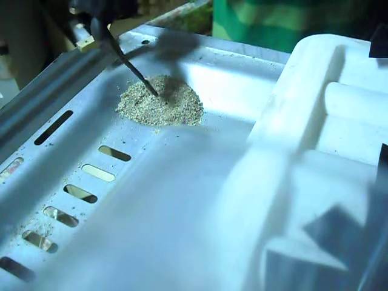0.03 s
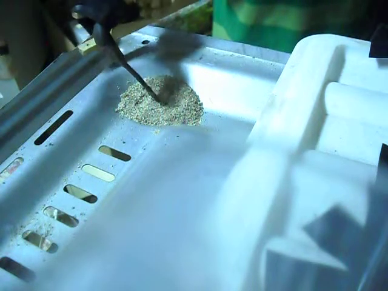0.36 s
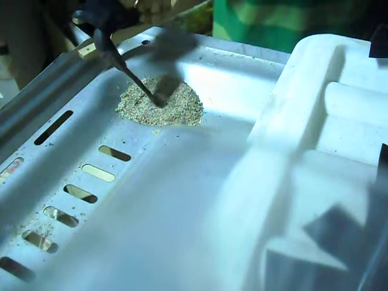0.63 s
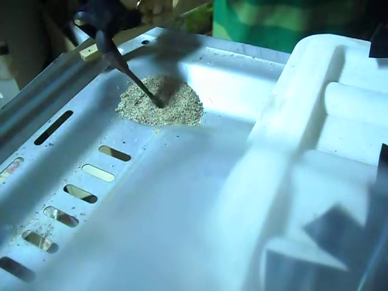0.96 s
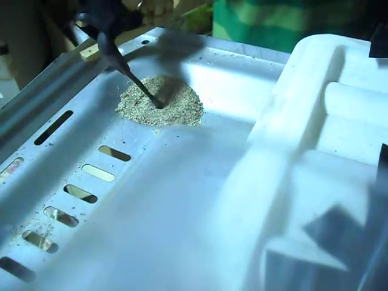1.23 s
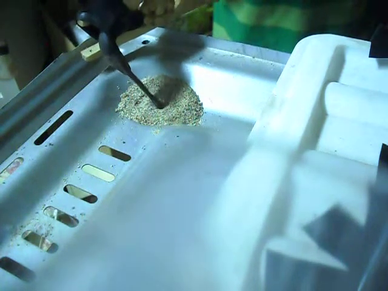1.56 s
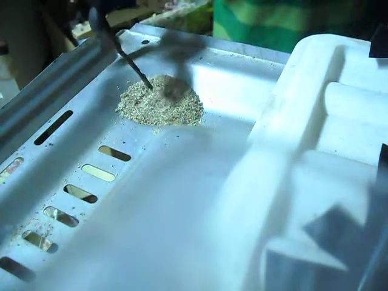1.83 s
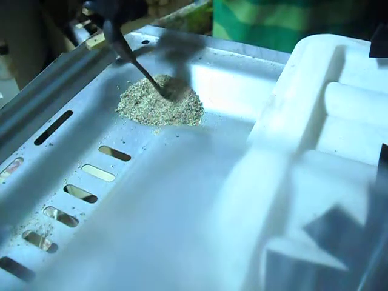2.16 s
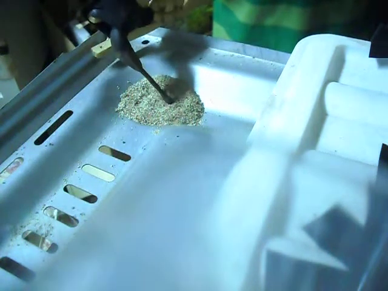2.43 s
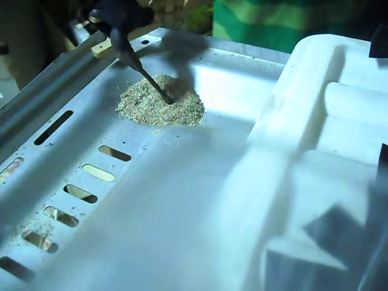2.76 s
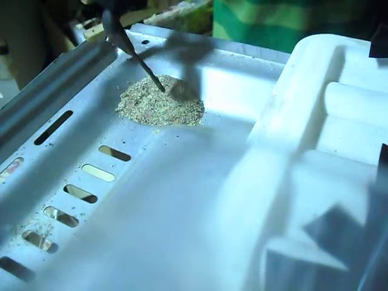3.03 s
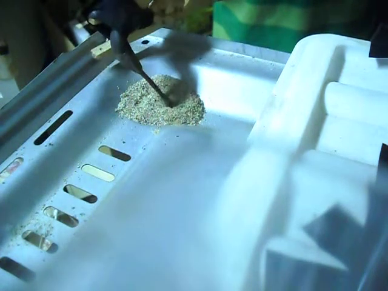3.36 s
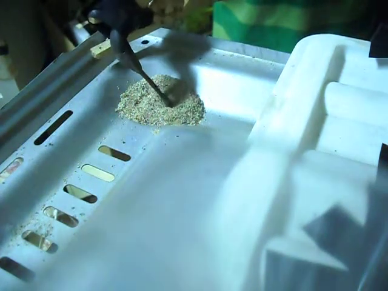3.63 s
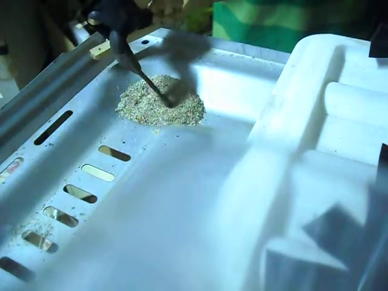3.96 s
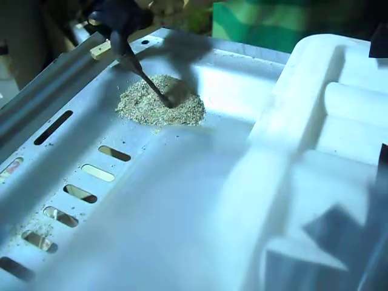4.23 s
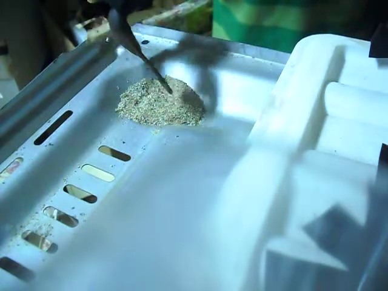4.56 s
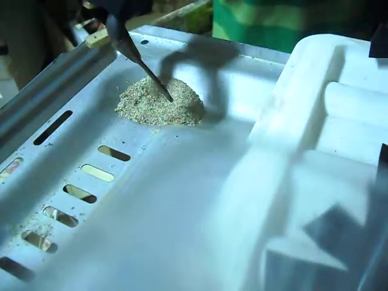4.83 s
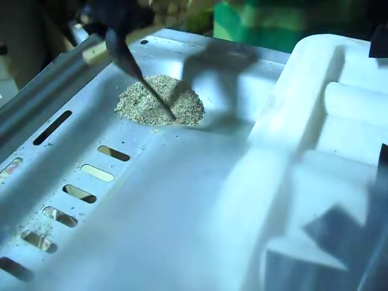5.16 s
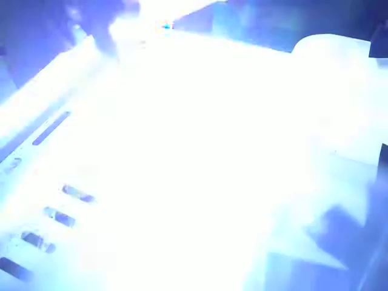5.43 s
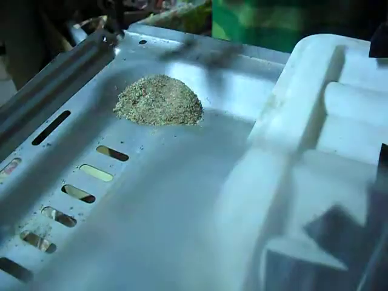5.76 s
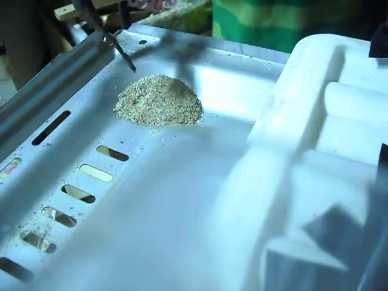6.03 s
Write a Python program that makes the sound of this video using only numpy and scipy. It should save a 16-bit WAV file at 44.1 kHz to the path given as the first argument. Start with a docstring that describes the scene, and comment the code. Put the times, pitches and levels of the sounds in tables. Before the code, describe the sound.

A high-voltage transformer hums deeply and steadily throughout, with faint room hiss, heard close to the bench in a small workshop with little echo. An electrode rod poking a heap of sand knocks softly and irregularly on a metal tray, at about 0.5, 0.7, 1.2, 2.0 and 2.3 seconds, each a dull thud with a slight ring. At 3.2 seconds comes a much louder, dry clack, followed by two small knocks and another at 4.4 seconds. At 5.2 seconds a tick, a thud and a brief hiss come as current starts to throb. From about 5.3 seconds an electric arc catches, sizzling and swelling fast into a loud, harsh buzz, the loudest sound here. It cracks twice and breaks off just after 5.6 seconds with a soft, low puff. One more light knock sounds at 5.9 seconds over the continuing hum.

```python
"""A small workshop, a camera microphone near the bench. A high-voltage transformer hums on 60 Hz mains
while an electrode rod pokes a heap of sand on a metal tray and knocks now and then. At about 5.2 s
current flows through the sand; then an arc catches, striking anew in every half cycle and collapsing
harder in one polarity. It sizzles, swells into a loud buzz as it is drawn out, cracks twice and
breaks after 0.3 s. One more knock follows over the hum."""
import sys
import numpy as np
from scipy import signal
from scipy.fft import rfft, irfft
from scipy.io import wavfile
from scipy.ndimage import uniform_filter1d, map_coordinates

SR = 44100
rng = np.random.default_rng(int(sys.argv[2]) if len(sys.argv) > 2 else 0)


def generate_wav(signal):
    """Clip the signal to [-1, 1] and save it as 16-bit WAV at the path in sys.argv[1]."""
    frames = np.transpose(np.atleast_2d(signal))
    scaled = np.clip(frames, -1, 1) * 32767
    pcm = np.round(scaled).astype(np.int16)
    wavfile.write(sys.argv[1], SR, pcm)


N = 268569
TIME = np.arange(N) / SR

MAINS_HZ = 59.985
STRIKE_S = 5.3772  # one strike of the arc; sets the phase of the mains
CONTACT_S, ARC_ON_S, ARC_OFF_S = 5.195, 5.33, 5.623  # current starts, arc catches, arc breaks


def arc(strike_db=-22.7, collapse_db=-17, weak_db=-10, scatter_db=1.5, jitter_ms=0.1, rebound=0.9):
    """Each half cycle the channel heats with a pressure pulse, then snaps shut; longer is louder, duller."""
    # how well the short channel radiates: (frequency [Hz], gain [dB])
    radiation = [(30, -10), (65, -30), (115, 2.5), (190, 3), (320, 1.5), (480, -2.5), (700, 0.5),
                 (1000, -1.5), (1450, 1.5), (2100, -5), (3200, -3.5), (4200, -5), (6000, 3), (8000, 0)]
    short_ms, long_ms = 0.13, 0.34  # pulse width at length 0 and 1
    max_lag_ms, lag_length = 2.31, 0.402  # the collapse trails the strike more as the arc grows
    snap_until_s, snap_fade_db_per_s = 5.478, 320  # only a short arc ends its collapse in a sharp snap
    overstretched_s, collapse_fade_db_per_s = 5.562, 310  # no louder from here; it stays hot, collapses fade
    cooling_ms = 1000 / (8 * MAINS_HZ)
    halves = np.arange(np.ceil((ARC_ON_S - STRIKE_S) * 2 * MAINS_HZ), (ARC_OFF_S - STRIKE_S) * 2 * MAINS_HZ)
    out = np.zeros(N)
    for half, chance in zip(halves, rng.standard_normal((len(halves), 4))):
        start = STRIKE_S + half / (2 * MAINS_HZ)
        near = abs(TIME - start) < 1 / MAINS_HZ
        ms = (TIME[near] - start) * 1000
        length = arc_length(start)
        drawn = min(length / arc_length(overstretched_s), 1)
        width_ms = short_ms + (long_ms - short_ms) * length
        heating_ms = 0.72 * width_ms
        # the air pushed out by the strike flows back slowly as the channel cools
        backflow = heating_ms / cooling_ms * bell(ms / cooling_ms - 2)
        strike = bell((ms - jitter_ms * chance[0]) / heating_ms) - backflow
        out[near] += drawn ** 1.23 * undb(strike_db + scatter_db * chance[2]) * strike
        lag_ms = max_lag_ms * np.tanh((length / lag_length) ** 2)
        u = (ms - lag_ms - 2 * jitter_ms * chance[1]) / width_ms
        snap_db = 2.5 - snap_fade_db_per_s * past(start, snap_until_s)
        collapse = clap(u, rebound) + undb(snap_db) * clap(u / 0.32, rebound)
        level_db = collapse_db + weak_db * (half % 2) - collapse_fade_db_per_s * past(start, overstretched_s)
        out[near] += drawn ** 1.7 * undb(level_db + scatter_db * chance[3]) * collapse
    # the corner of the tray rings briefly after every pulse
    return colour(out + undb(-6) * resonance(out, hz=900, width_hz=450), radiation)


def arc_length(s):
    """Length of the arc, growing evenly from 0 when it catches to 1 when it breaks."""
    return np.clip((s - ARC_ON_S) / (ARC_OFF_S - ARC_ON_S), 0, 1)


def sizzle(delay_ms=4.1, width_ms=0.99, weak_db=-9, steady_db=-17, flicker_db=2.5, spit_ms=0.11):
    """The hot sand hisses near each current peak, mostly in one polarity; single sparks tick."""
    # hiss of the sand: (frequency [Hz], density [dB per Hz])
    spectrum = [(500, -7), (1400, 7.5), (2500, -5), (4200, -6), (6300, 5), (7900, -6), (10000, 4),
                (12500, -5.5)]
    # sand heated at first touch, then under the arc: (start [s], end [s], level [dB])
    burns = [(5.202, 5.225, -48), (5.336, 5.623, -41)]
    # lone sparks: (time [s], level [dB], t60 [s])
    sparks = [(5.195, -45, 0.0032), (5.3933, -37, 0.0035), (5.5047, -38, 0.014), (5.577, -47, 0.003)]
    rise_db_per_s, fall_db_per_s, lift_db = 550, 3000, -7
    half, part = np.divmod((TIME - STRIKE_S) * 2 * MAINS_HZ, 1)
    ms = part * 1000 / (2 * MAINS_HZ)
    gate = bell((ms - delay_ms) / width_ms) * undb(weak_db * (1.5 - half % 2)) + undb(steady_db)
    gate += 0.22 * np.exp(-ms / spit_ms)  # every strike also spits briefly
    heat = sum(undb(db - rise_db_per_s * past(start, TIME) - fall_db_per_s * past(TIME, end))
               for start, end, db in burns)
    # the hiss weakens as the arc lifts off the sand
    envelope = (TIME > CONTACT_S) * gate * heat * undb(lift_db * arc_length(TIME) + flicker_db * walk(150))
    for s, db, t60 in sparks:
        envelope += undb(db) * fade(TIME - s, t60)
    speed = 1 - 0.07 * arc_length(TIME)  # the bright bands sink as the arc grows
    return envelope * map_coordinates(noise(spectrum), [np.cumsum(speed)], order=3, mode="wrap")


def cracks(hz=3000, width_hz=1900, t60=0.016):
    """Short rasping bursts where the long channel kinks."""
    # kinks of the channel: (time [s], level [dB])
    kinks = [(5.5447, -44), (5.5617, -40.5)]
    rasp = unit(resonance(resonance(rng.standard_normal(N), hz, width_hz), hz, width_hz))
    return rasp * sum(undb(db) * fade(TIME - s, t60) for s, db in kinks)


def heated_air(throb_db=-46, flutter_db=-60, tray_db=-56, growth_db=6.5, rise_s=0.038, lag_s=0.0025):
    """Under current the air throbs at twice the mains rate and flutters; the tray sings until the rod lifts."""
    flowing = np.minimum(past(TIME, CONTACT_S) / rise_s, 1) * fade(past(TIME, ARC_OFF_S), t60=0.018)
    # near full length the throb grows and catches up with the strike
    stretch = arc_length(TIME) ** 3
    turn = 2 * np.pi * MAINS_HZ * (TIME - STRIKE_S - lag_s * (1 - stretch))
    # unequal polarities add an odd multiple of the mains
    throb = np.sqrt(2) * (np.cos(2 * turn) + undb(-17) * np.cos(3 * turn))
    tray = unit(resonance(rng.standard_normal(N), hz=480, width_hz=45))
    flutter = unit(resonance(rng.standard_normal(N), hz=220, width_hz=130))
    air = undb(growth_db * stretch) * (undb(throb_db) * throb + undb(flutter_db) * flutter)
    return flowing * (air + undb(tray_db) * tray * fade(past(TIME, ARC_ON_S), t60=0.08))


def break_puff(db=-52, width_s=0.0056):
    """The last hot air collapses with a soft, low puff when the arc breaks."""
    return undb(db) * clap((TIME - ARC_OFF_S - width_s) / width_s, rebound=0.45)


def knocks(chatter_s=0.0082, thud_lag_s=0.018, settle_s=0.0048, onset_s=0.00059, thud_t60=0.076):
    """The rod chatters with a dry clack, then its weight thuds down, ringing the tray and shaking the bench."""
    # blows of the rod and its holder: (time [s], clack level [dB], thud level [dB], bench level [dB])
    blows = [(0.525, -73, -61, -76), (0.74, -79, -64, -58), (1.172, -64.5, -58.5, -58),
             (1.255, -67, -61, -69), (2.025, -78, -54, -69), (2.296, -60.5, -57, -52.5),
             (3.14, -69, -62, -76), (3.1899, -35, -38, -49), (3.32, -63, -57.5, -64),
             (3.415, -75, -57.5, -74), (4.37, -73, -64, -78), (5.201, -64, -49, -70),
             (5.885, -63.5, -65, -78)]
    # dense short resonances of tray and bench, dull and bright: (frequency [Hz], density [dB per Hz])
    thud_spectrum = [(25, -3), (55, 0), (90, -0.5), (130, -4), (220, 6.5), (340, -2.5), (460, 1), (700, -3),
                     (1200, -13), (3000, -60)]
    clack_spectrum = [(150, -17), (500, 3), (900, 0.5), (1300, 7), (1800, -2.5), (2500, -13), (3400, -14),
                      (4500, -27), (7000, -38), (11000, -48)]
    # modes of the tray and of the bench under it: (frequency [Hz], level [dB], t60 [s])
    tray_modes = [(192, -23, 0.2), (382, -12.5, 0.18), (418, -9.5, 0.28), (467, -20, 0.69),
                  (497.5, -21.5, 0.69), (1090, -39, .2), (1076, -39, .2)]
    bench_modes = [(33, -2, 0.2), (52, -4, 0.15), (179, 0.5, 0.3)]
    dull, bright = noise(thud_spectrum), noise(clack_spectrum)
    out = np.zeros(N)
    for s, clack_db, thud_db, bench_db in blows:
        near = (TIME >= s) & (TIME < s + 0.5)
        age = TIME[near] - s
        landed = age - thud_lag_s
        clack = undb(clack_db) * bright[near] * fade(past(age, chatter_s), t60=0.055)
        landing = (1 - bell(past(age, thud_lag_s) / onset_s)) * fade(past(landed, settle_s), thud_t60)
        weight = undb(-8) * fade(age, thud_t60) + landing
        thud = undb(thud_db) * (dull[near] * weight + undb(-2) * ringing(landed, tray_modes))
        soft_contact = 1 - bell(age / onset_s)
        out[near] += (thud + clack) * soft_contact + undb(bench_db) * ringing(landed, bench_modes)
    return out


def transformer(hum_db=-50.5, wander_db=0.42, waver_db=1.4, drift_rad=0.022, dispersion_rad=0.29):
    """The core flexes twice a mains cycle; the overtones waver a little on their own."""
    # strong and faint partials of the core: (frequency [multiple of the mains], level [dB])
    strong = [(2, 0), (4, -7.5), (6, -17), (8, -13), (10, -19), (12, -11), (14, -15), (16, -25),
              (18, -26.5), (20, -33), (22, -28.5), (24, -31.5)]
    faint = [(3, -28), (26, -54), (30, -40)]
    turn = 2 * np.pi * MAINS_HZ * (TIME - STRIKE_S)
    out = -np.cos(2 * turn)  # the core pulls hardest midway between two strikes
    for multiple, db in list(strong) + list(faint):
        k = round(multiple)
        if k != 2:
            # higher bending waves cross the plates faster, which smears each pull over the cycle
            phase = dispersion_rad * k ** 2 + drift_rad * walk(4)
            out += undb(db + waver_db * walk(3.774)) * np.cos(k * turn + phase)
    return unit(out) * undb(hum_db + wander_db * walk(2.6))


def workshop(x, t60=0.19, tail_db=-14):
    """Bench and near walls add a short tail."""
    # colour of the reflections: (frequency [Hz], density [dB per Hz])
    spectrum = [(50, 4), (200, 1), (900, -5.5), (3000, 4.5), (10000, -12.0)]
    age = TIME[:SR // 2]
    tail = noise(spectrum)[:len(age)] * fade(age, t60)
    return x + undb(tail_db) * signal.fftconvolve(x, tail / np.linalg.norm(tail))[:N]


def room_tone(db=-65.5):
    """Steady room air and microphone hiss."""
    # noise floor: (frequency [Hz], density [dB per Hz])
    spectrum = [(20, 3.5), (60, -1.5), (160, -6.5), (400, -10), (1000, -15), (2000, -18.5), (3000, -19.5),
                (5000, -23), (8000, -24), (10000, -25), (12000, -25.5)]
    return undb(db) * noise(spectrum)


def undb(db):
    """Decibels to gain."""
    return 10 ** (np.asarray(db) / 20)


def unit(x):
    """Scale to rms 1."""
    return x / np.sqrt(np.mean(x ** 2))


def colour(x, points):
    """Filter by a curve of (frequency [Hz], gain [dB])."""
    hz, db = np.transpose(points)
    bins = np.maximum(np.fft.rfftfreq(len(x), 1 / SR), 1)
    return irfft(rfft(x) * undb(np.interp(np.log(bins), np.log(hz), db)), len(x))


def noise(points):
    """Coloured noise of rms 1."""
    return unit(colour(rng.standard_normal(N), points))


def walk(rate_hz):
    """Smooth random wander with a spread near 1."""
    hold = int(SR / rate_hz)
    steps = np.repeat(rng.standard_normal(N // hold + 1), hold)
    return 1.3 * uniform_filter1d(uniform_filter1d(steps, hold), hold)[:N]


def past(s, mark):
    """Seconds since the mark, 0 before it."""
    return np.maximum(s - mark, 0)


def fade(age, t60):
    """Exponential decay that starts at age 0."""
    return (age >= 0) * np.exp(-np.log(1000) * np.maximum(age, 0) / t60)


def bell(x):
    """Gaussian bump of height 1."""
    return np.exp(-x ** 2 / 2)


def clap(u, rebound):
    """A pressure dip between two overshoots; u is time in pulse widths."""
    return (rebound * u ** 2 - 1) * bell(u)


def resonance(x, hz, width_hz):
    """Band-pass with gain 1 at the centre."""
    return signal.lfilter(*signal.iirpeak(hz, hz / width_hz, fs=SR), x)


def ringing(age, modes):
    """One decaying sine for each mode."""
    return sum(undb(db) * fade(age, t60) * np.sin(2 * np.pi * hz * age) for hz, db, t60 in modes)


def scene():
    """Arc and knocks on the tray, over transformer hum and room tone, in mono."""
    on_tray = workshop(arc() + sizzle() + knocks() + cracks()) + heated_air() + break_puff()
    return (on_tray + transformer() + room_tone())[None]


def record(dry, top_hz=12000):
    """A small camera microphone: thin in the deepest bass, with the top cut away."""
    # microphone response: (frequency [Hz], gain [dB])
    response = [(10, -11), (35, -3), (80, -2.5), (10000, -1), (10500, -7), (11000, -17), (12000, -19.5)]
    low_pass = signal.ellip(8, 0.2, 70, top_hz, fs=SR, output="sos")
    return signal.sosfilt(low_pass, colour(dry[0], response))[None]


dry = scene()
out = record(dry)
generate_wav(out)
```